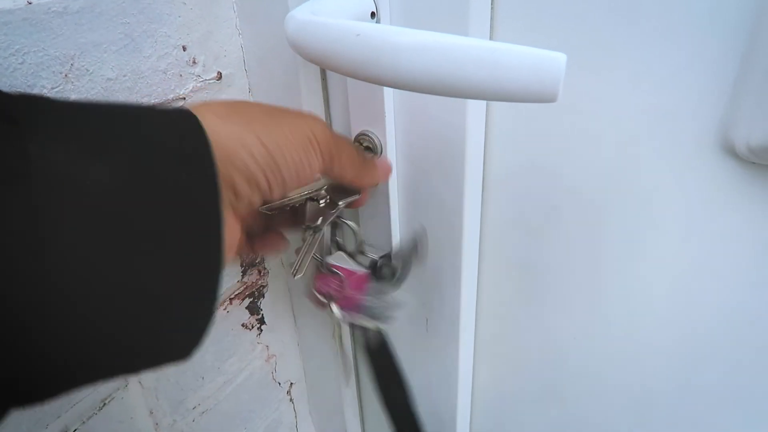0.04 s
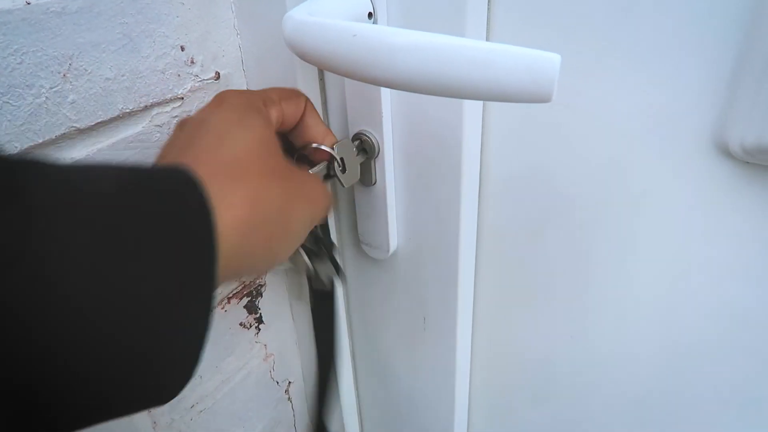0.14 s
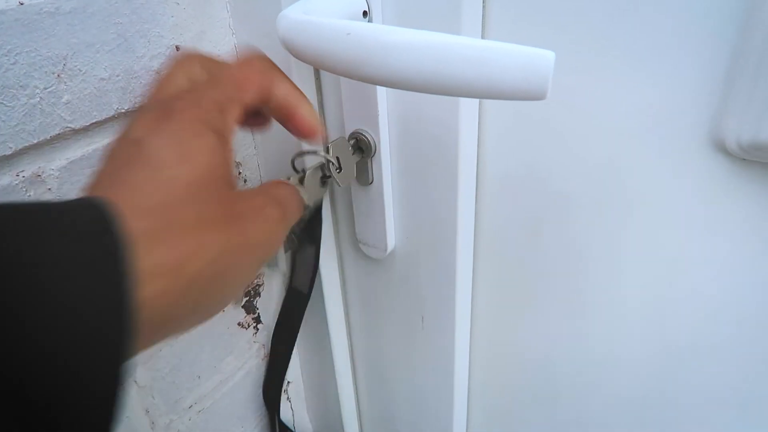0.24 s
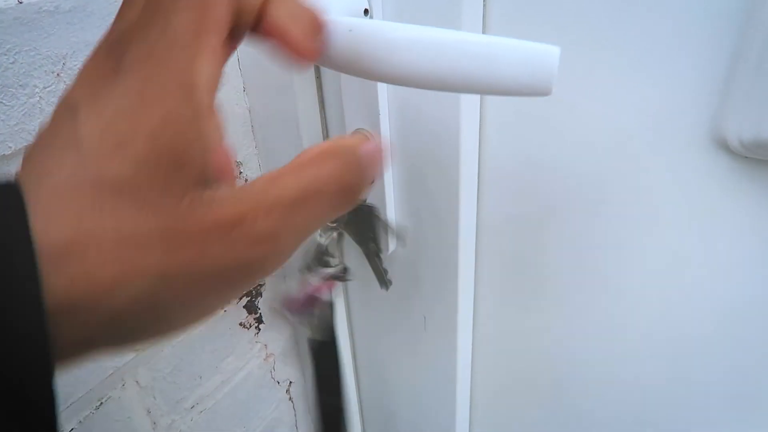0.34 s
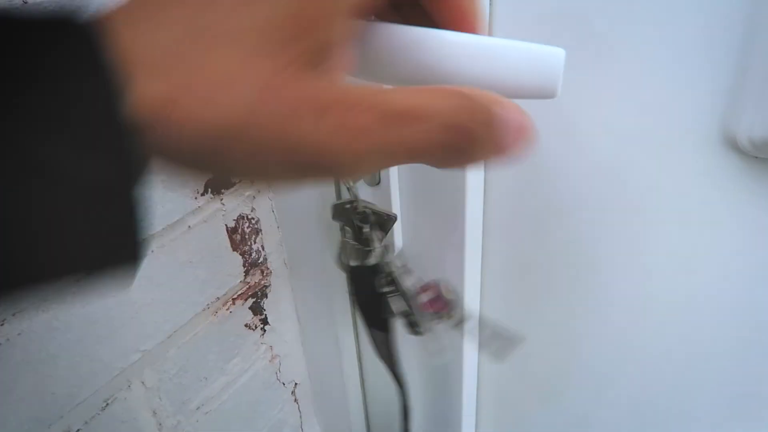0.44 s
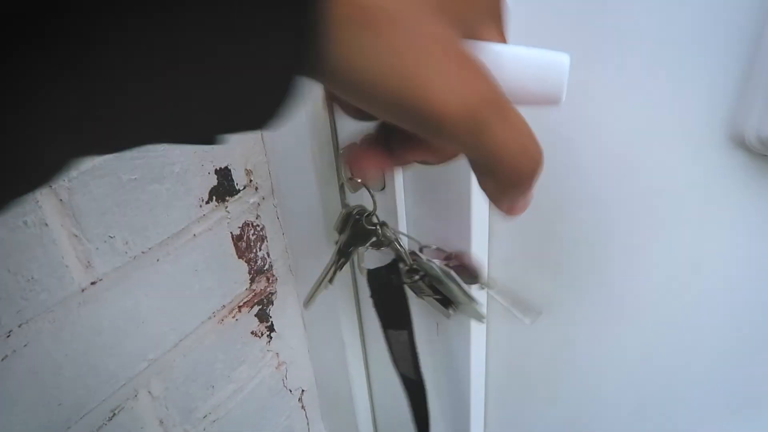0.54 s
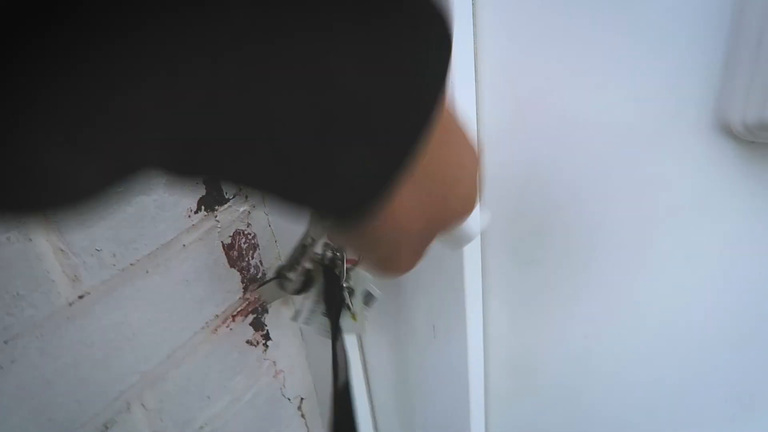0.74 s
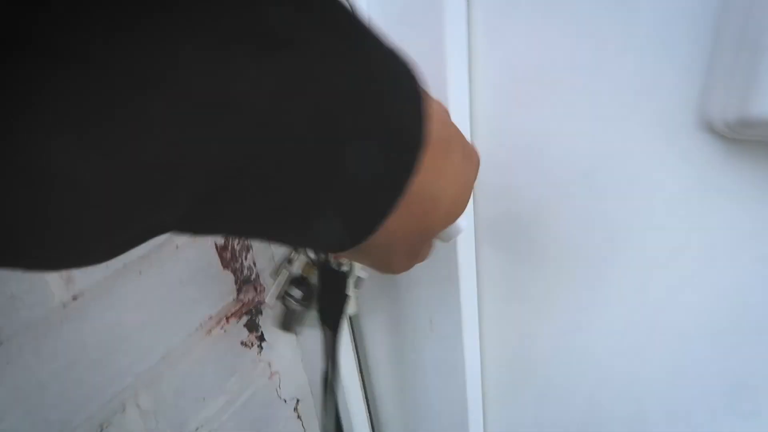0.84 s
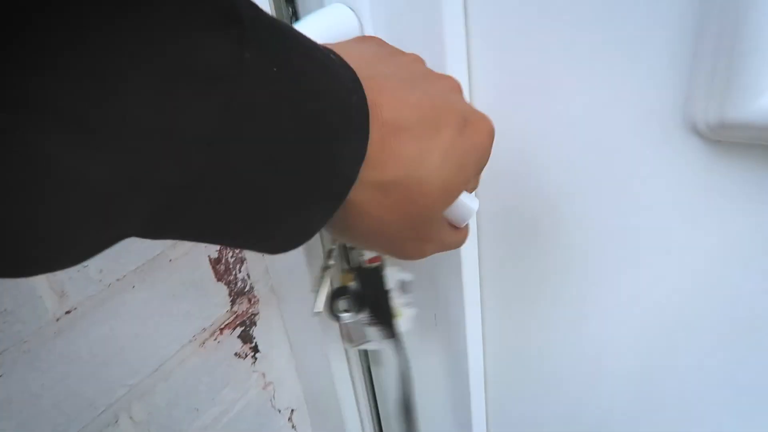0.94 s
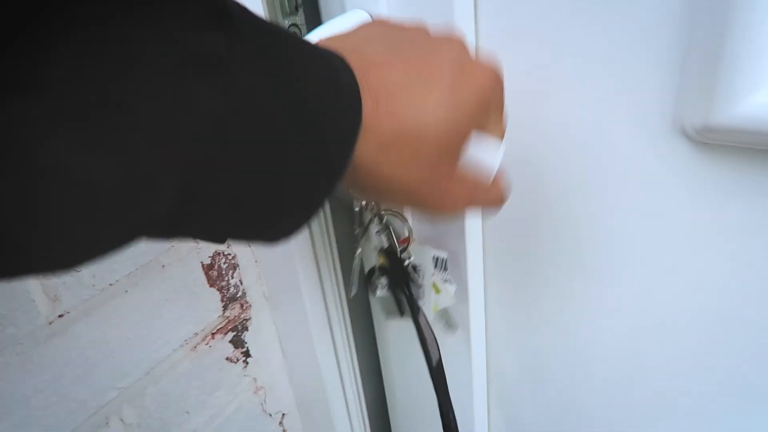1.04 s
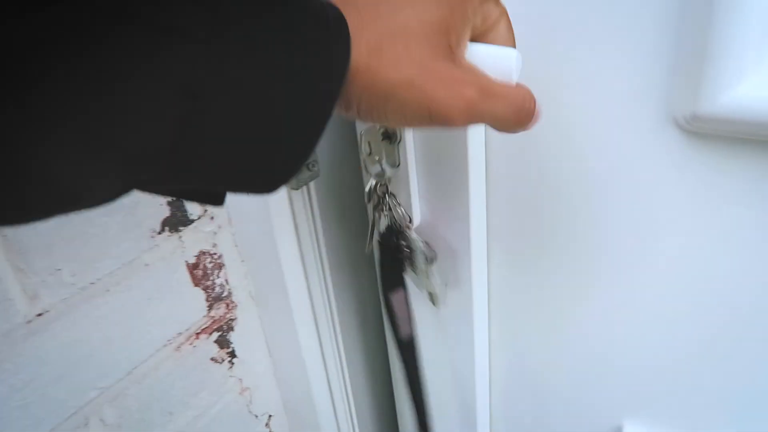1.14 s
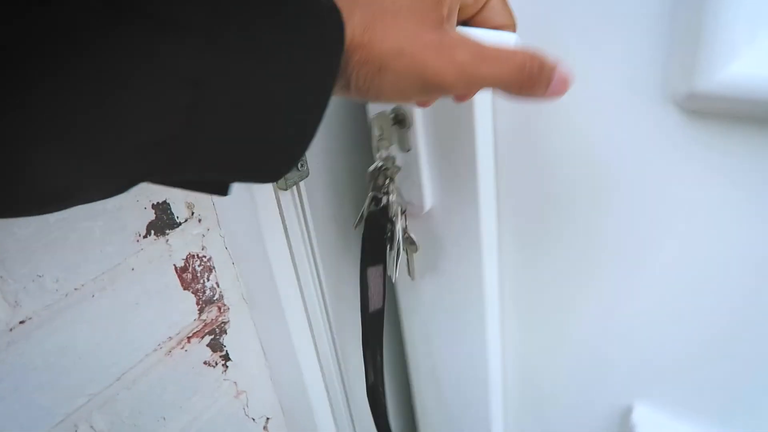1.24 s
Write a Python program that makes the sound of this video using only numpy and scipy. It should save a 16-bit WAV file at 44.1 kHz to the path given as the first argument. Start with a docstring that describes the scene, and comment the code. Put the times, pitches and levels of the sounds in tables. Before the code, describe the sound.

Door lock worked with a key: clicks, bright key jingle, latch scrape and a low door thump

```python
"""A key is turned in a door lock, close to a phone, over the faint scrape of metal (ticks through resonances)
and the rumble of the door leaf (low resonant noise). Pins and bolt click (noise cracks with rattling tails),
loose keys knock together and ring (sine modes) until the next touch damps them, and the leaf thumps
(low damped sines). Then the handle is pressed, the latches scrape back and the door thumps free."""
import sys
import numpy as np
from scipy import signal
from scipy.fft import rfft, irfft
from scipy.io import wavfile

SR = 44100
rng = np.random.default_rng(int(sys.argv[2]) if len(sys.argv) > 2 else 0)


def int16_out(signal):
    """Quantize to a 16-bit WAV file."""
    q = np.round(np.clip(np.atleast_2d(signal).T, -1, 1) * 32767)
    wavfile.write(sys.argv[1], SR, q.astype(np.int16))


N = 57330  # 1.3 s

# modes of each loose key, the latch, lock barrel and face plate, by name: (frequency [Hz], level [dB], t60 [s])
OBJECT_MODES = {"brass": [(8609, 0, .2), (8578, -10, .2)], "tip": [(15520, 0, .3)],
                "steel": [(10155, 0, .2), (9920, -3, .1)], "small": [(10880, 0, .7)],
                "thin": [(12460, 0, .1)], "barrel": [(915, 0, .15)], "long": [(7440, 0, .4)],
                "ring": [(3520, 0, .4)], "tag": [(9085, 0, .3)], "latch": [(2882, 0, .25)],
                "plate": [(440, -5, .12), (575, 0, .12), (735, -6, .1)]}
# resonances of the lock case: (frequency [Hz], width [Hz], level [dB])
LOCK_CASE = [(281, 116, 3.5), (417, 120, 3.5), (604, 192, 2.5), (852.4, 110, 2.5), (1042.4, 51, -2.5),
             (1335, 280, -0.5), (2230, 920, -3)]


def amp(db):
    """Amplitude of a level in dB."""
    return 10 ** (np.asarray(db, float) / 20)


def unit(x):
    """Scale to an rms of 1."""
    return x / np.sqrt(np.mean(x ** 2))


def band(x, lo_hz, hi_hz):
    """Butterworth band-pass."""
    return signal.sosfilt(signal.butter(2, [lo_hz, hi_hz], "bandpass", fs=SR, output="sos"), x)


def peak(x, hz, width_hz):
    """One resonance that answers at once, unit energy for a click."""
    b, a = signal.iirpeak(hz, hz / width_hz, fs=SR)
    return signal.lfilter(b, a, x) * np.sqrt(SR / width_hz / np.pi)


def body(x, resonances, alternate=True):
    """Parallel resonances (Hz, width Hz, dB), by default with alternating signs."""
    total = 0
    for k, (hz, width_hz, db) in enumerate(resonances):
        sign = (-1) ** k if alternate else 1
        total = total + sign * amp(db) * peak(x, hz, width_hz)
    return total / np.sqrt(len(resonances))


def colour(x, points):
    """Filter by (Hz, dB) points, interpolated over log frequency."""
    point_hz, db = np.array(points, float).T
    hz = np.fft.rfftfreq(len(x), 1 / SR) + 1  # +1 avoids log(0)
    gain = amp(np.interp(np.log(hz), np.log(point_hz), db))
    return irfft(rfft(x) * gain, len(x))


def fade(t, t60_s):
    """Exponential decay by 60 dB in t60_s."""
    return np.exp(-np.log(1000) * t / t60_s)


def rise(t, rise_s):
    """Exponential onset."""
    return 1 - np.exp(-t / rise_s)


def add(out, start_s, x):
    """Mix x into out at start_s."""
    i = int(start_s * SR)
    out[i:i + len(x)] += x[:N - i]


def curve(points, column):
    """Amplitude over time from a dB column, interpolated in dB."""
    rows = np.array(points)
    return amp(np.interp(np.arange(N) / SR, rows[:, 0], rows[:, column]))


def damped_mode(hz, t60_s, length_s, damp_s, rise_s, kept=0):
    """A struck mode that a touch damps after length_s down to the share kept."""
    after_s = .5 if kept else 10 * damp_s
    t = np.arange(int((length_s + after_s) * SR)) / SR
    touch = kept + (1 - kept) * np.exp(-np.maximum(t - length_s, 0) / damp_s)
    return np.sin(2 * np.pi * hz * t) * fade(t, t60_s) * rise(t, rise_s) * touch


def scrape():
    """Sliding metal: dense uneven ticks through the lock case; they also shake the keys a little."""
    # key, bolt and latches: (time [s], level [dB], treble level [dB])
    scrape_levels = [(0, -45.5, -52), (.21, -48.5, -48), (.26, -45, -54), (.33, -46, -53),
                     (.40, -47.5, -51), (.525, -42, -49), (.56, -42.5, -58.5), (.62, -47.5, -59),
                     (.69, -50, -46.5), (.735, -38, -47), (.79, -44, -64), (.81, -27, -57), (.85, -25, -53),
                     (.92, -28.5, -52), (.94, -38, -75), (.99, -45.5, -58), (1.04, -29, -75),
                     (1.07, -52.5, -86), (1.19, -52, -82), (1.27, -40.5, -70), (1.3, -50.5, -56)]
    # treble resonances: (frequency [Hz], width [Hz], level [dB])
    treble_body = [(2870, 380, 5), (5900, 8400, 2), (11840, 1700, -3)]
    ticks_per_s, tick_spread_db = 2700, 4.5
    jingle_db, jingle_width_hz = -9.5, 95
    ticks = (rng.random(N) < ticks_per_s / SR) * rng.standard_normal(N)
    ticks = unit(ticks * amp(tick_spread_db * np.minimum(rng.exponential(size=N), 2)))
    key_modes = [(hz, jingle_width_hz, db)
                 for modes in OBJECT_MODES.values() for hz, db, _ in modes if hz > 3000]
    jingle = body(ticks, key_modes)
    case = band(body(ticks, LOCK_CASE), 183, 4700)
    treble = band(body(ticks, treble_body) + amp(jingle_db) * jingle, 3240, 12800)
    return curve(scrape_levels, column=1) * case + curve(scrape_levels, column=2) * treble


def rumble():
    """The leaf rumbles under the hand: noise through its low resonances."""
    # (time [s], level [dB])
    rumble_levels = [(0, -54.5), (.3, -38.5), (.45, -43.5), (.6, -37.5), (.69, -49), (.72, -33.5),
                     (.8, -30.5), (.87, -27), (.97, -33.5), (1.05, -33.5), (1.17, -44), (1.2, -51),
                     (1.3, -41)]
    # door leaf: (frequency [Hz], width [Hz], level [dB])
    leaf = [(60, 20, -0.5), (81.9, 3.3, 2), (109, 44, 5), (156.8, 25, 4), (223, 39, 2)]
    return curve(rumble_levels, column=1) * band(body(rng.standard_normal(N), leaf), 27.5, 230)


def air():
    """Steady background noise, falling towards the treble."""
    # spectrum: (frequency [Hz], level [dB])
    air_spectrum = [(100, 0.5), (1500, -19), (5000, -30), (12000, -41), (16000, -64)]
    level_db = -48
    return amp(level_db) * unit(colour(rng.standard_normal(N), air_spectrum))


def clicks():
    """A short pitched crack with a rattling tail; the same blow rings the lock case and makes the bunch shimmer."""
    # lock, keys and handle: (time [s], level [dB], crack frequency [Hz], bass re level [dB],
    # treble re level [dB], tail re crack [dB])
    click_rows = [(0.0266, -28, 7400, -17, 2.5, -9.5), (0.0487, -31, 5700, -32, -9, -5.5),
                  (0.094, -23.5, 6740, -47, 3, -22.5), (0.1265, -31, 7000, -9.5, -17, -25),
                  (0.1429, -28.5, 5560, -26, -9, -5.5), (0.1926, -28.5, 6740, -20.5, -20, -9.5),
                  (0.2255, -17, 5440, -30, 2, -12), (0.244, -21.5, 1880, -13, -5, -6),
                  (0.2518, -24, 2180, -6.5, 3.5, -10.5), (0.2722, -27.5, 2480, -17, -26, -8),
                  (0.296, -24.5, 2700, -24, -31, -13.5), (0.3506, -30.5, 2750, -37, -21, -2.5),
                  (0.3627, -16.5, 2260, -21.5, -14.5, -9), (0.419, -16.5, 2590, -31, -11, -16.5),
                  (0.4466, -4.5, 5600, -23, -13, -15), (0.4688, -8.5, 6260, -20.5, -8.5, -15),
                  (0.52, -30.5, 12000, -22, -5, -6), (0.632, -7.5, 1700, -16.5, -15, -25),
                  (0.6364, -11.5, 2100, -14.5, -30, -12.5), (0.639, -12, 2370, -14, -16.5, -17),
                  (0.7004, -31, 5600, -10.5, -25, -2), (0.7056, -24, 5800, -20, -27, -11),
                  (0.7105, -25.5, 3550, -5, -20, -8), (0.7277, -38.5, 2170, -19, 3, -7),
                  (0.7585, -38.5, 2860, 3.5, -20, -17), (0.801, -31, 2120, -1.5, -42, -8.5),
                  (0.8385, -26.5, 1300, -20, -34, -6), (0.8524, -31, 4150, -13.5, -44, 5.5),
                  (0.8697, -14.5, 5580, -12.5, -28, -10.5), (0.9953, -38, 3600, -31, -35, 4.5),
                  (1.007, -21.5, 5200, -13.5, -17.5, -11), (1.0207, -26, 2930, -5.5, -39, -14.5),
                  (1.078, -49, 1200, 11, -30, -16), (1.157, -38.5, 2170, -55, -45, 0),
                  (1.207, -21.5, 2440, -14, -16, -5.5), (1.2535, -32, 2060, -23, -17, 3)]
    crack_t60_s, tail_t60_s, case_t60_s, bunch_t60_s = 0.0053, 0.11, 0.16, 0.04
    tone_db, strike_db, rise_s = 1.5, 12.5, 0.000092
    bunch_top_hz = 13300
    out, blows, t = np.zeros(N), np.zeros(N), np.arange(SR // 5) / SR
    crack, tail = fade(t, crack_t60_s), fade(t, tail_t60_s)
    # many small partials of the whole bunch
    partial_hz = rng.uniform(7065, bunch_top_hz, size=(50, 1))
    bunch = np.sin(2 * np.pi * partial_hz * t).sum(axis=0) * fade(t, bunch_t60_s)
    for start_s, db, hz, bass_db, treble_db, tail_db in click_rows:
        mid_noise, blow_noise, treble_noise = rng.standard_normal((3, len(t)))
        mid = unit(band(mid_noise, 730, 3740) + 0.82 * band(mid_noise, hz * 0.58, hz * 0.9))
        mid = mid * (crack + amp(tail_db) * tail) / 1.72
        tone = amp(tone_db) * np.cos(2 * np.pi * hz * t) * crack
        shimmer = unit(signal.fftconvolve(treble_noise, bunch)[:len(t)])
        treble = unit(band(treble_noise, 6800, bunch_top_hz)) * crack + shimmer * amp(tail_db) * tail
        add(out, start_s, amp(db) * (mid + tone + amp(treble_db) * treble) * rise(t, rise_s))
        blow = blow_noise + amp(strike_db) * (t == 0)  # noise plus a one-sample strike
        blow_shape = fade(t, 3 * crack_t60_s) + amp(tail_db + 7.5) * fade(t, case_t60_s)
        add(blows, start_s, amp(db + bass_db) * blow * blow_shape)
    return out + band(body(blows, LOCK_CASE, alternate=False), 293, 3600)


def keys():
    """Each knock rings one object's modes until it is touched again; the level of each ring wobbles at random."""
    # (time [s], object, level [dB], length until damped [s])
    ring_rows = [(.2275, "tag", -35, .0165), (.407, "small", -30, .012), (.407, "steel", -38, .011),
                 (.447, "thin", -23, .017), (.447, "barrel", -27, .03), (.4475, "steel", -31, .042),
                 (.448, "small", -38, .175), (.464, "tip", -34, .026), (.468, "brass", -21, .013),
                 (.497, "tip", -34, .032), (.498, "brass", -23.5, .014), (.519, "brass", -30, .01),
                 (.535, "long", -43, .033), (.564, "ring", -43.5, .043), (.59, "brass", -39.5, .028),
                 (.59, "thin", -46, .02), (.592, "steel", -39, .032), (.632, "plate", -27, .03),
                 (.64, "latch", -28.5, .047), (.642, "long", -46, .044), (.647, "thin", -44, .037),
                 (.667, "brass", -32, .013), (.904, "small", -40, .01), (1.207, "plate", -31, .015),
                 (1.221, "long", -48, .066), (1.262, "brass", -44.5, .0085)]
    damp_s, rise_s = 0.0015, 0.0008
    kept_db = -19  # a touch leaves a little of the ring
    wobble_db, wobble_top_hz = 3, 160
    out = np.zeros(N)
    for start_s, name, db, length_s in ring_rows:
        sound = sum(amp(db + mode_db) * damped_mode(hz, t60_s, length_s, damp_s, rise_s, amp(kept_db))
                    for hz, mode_db, t60_s in OBJECT_MODES[name])
        wobble = unit(band(rng.standard_normal(SR), 22, wobble_top_hz))[-len(sound):]
        add(out, start_s, sound * amp(wobble_db * wobble))
    return out


def thumps():
    """The door leaf thumps when pushed or pulled: low modes, soon damped, signed by direction."""
    # (time [s], level [dB], frequency [Hz], t60 [s], length until damped [s], push 1 or pull -1)
    thump_rows = [(0.241, -32, 106, 0.23, 0.027, -1), (0.245, -42, 60, 2.1, 0.18, 1),
                  (0.573, -23.5, 279, 0.1, 0.026, -1), (.706, -26.5, 45, 0.87, 0.18, 1),
                  (.712, -19.5, 177, 0.093, 0.039, 1), (.8918, -7.5, 114, 1.5, .0122, 1),
                  (.9256, -17, 108, .4, .013, 1), (0.94, -17, 74.7, 0.21, 0.16, -1),
                  (1.0152, -16.5, 110, 0.061, 0.015, -1)]
    damp_s, rise_s = 0.0013, 0.00071
    out = np.zeros(N)
    for start_s, db, hz, t60_s, length_s, way in thump_rows:
        thump = damped_mode(hz, t60_s, length_s, damp_s, rise_s)
        add(out, start_s, np.sign(way) * amp(db) * thump)
    return out


def reflect(x, t60_s):
    """Convolve with unit-energy decaying noise: dense reflections."""
    t = np.arange(SR // 5) / SR
    response = rng.standard_normal(len(t)) * fade(t, t60_s)
    return signal.fftconvolve(x, response / np.linalg.norm(response))[:N]


def stereo(mid):
    """The two microphones differ by short reflections, mostly treble, that shift as hand and keys move."""
    # (frequency [Hz], side re mid [dB])
    side_spectrum = [(150, -40), (300, -8), (2000, -15.5), (5000, -10.5), (10000, -3.5)]
    side_t60_s, shift_top_hz = 0.011, 30.4
    shift = unit(band(rng.standard_normal(N), 4.36, shift_top_hz))
    side = colour(reflect(mid, side_t60_s) * shift, side_spectrum)
    return np.array([mid + side, mid - side])


def scene():
    """Lock and keys with a short echo, plus door and air, in stereo."""
    echo_db, echo_t60_s = -11, 0.074
    near = scrape() + clicks() + keys()
    near = near + amp(echo_db) * reflect(near, echo_t60_s)
    return stereo(near + rumble() + thumps() + air())


def record(dry):
    """Limit the band: no deepest bass, nothing above about 16 kHz."""
    bass_cut_hz, top_hz = 28, 15900
    dry = signal.sosfilt(signal.butter(2, bass_cut_hz, "highpass", fs=SR, output="sos"), dry)
    return signal.sosfilt(signal.ellip(10, .2, 80, top_hz, fs=SR, output="sos"), dry)


dry = scene()
out = record(dry)
int16_out(out)
```